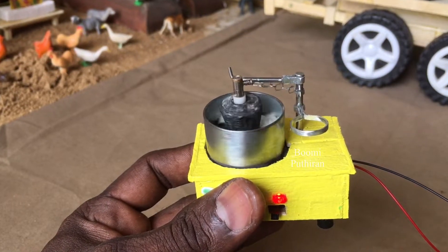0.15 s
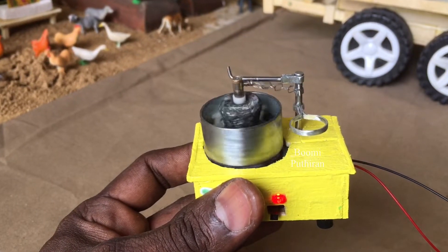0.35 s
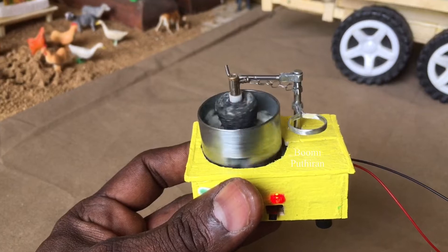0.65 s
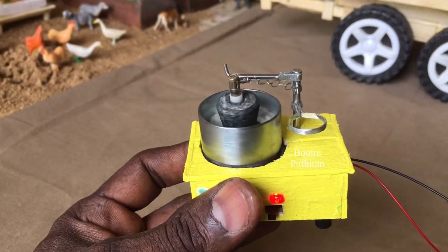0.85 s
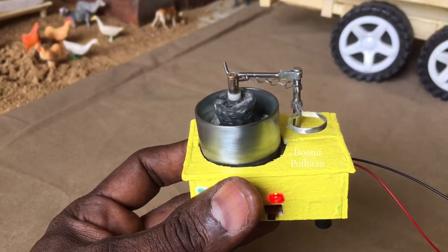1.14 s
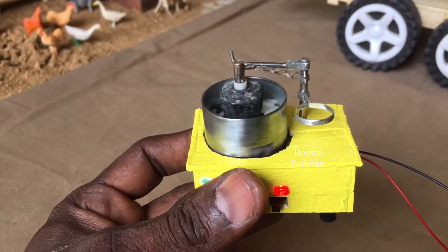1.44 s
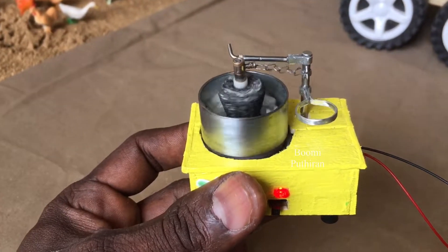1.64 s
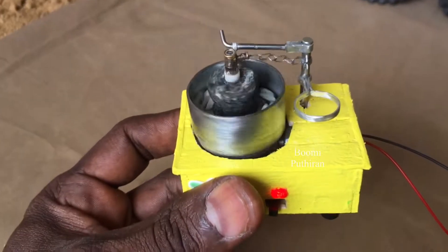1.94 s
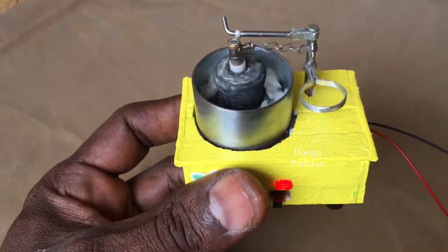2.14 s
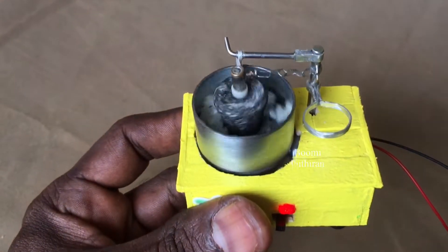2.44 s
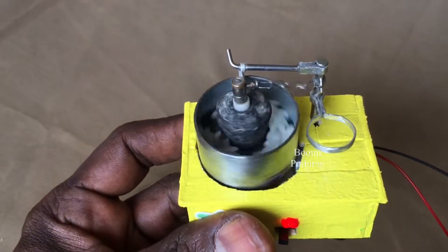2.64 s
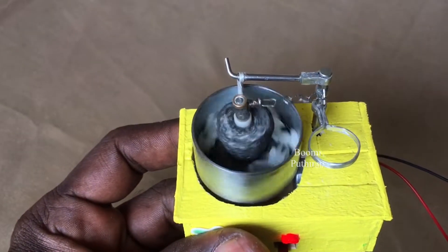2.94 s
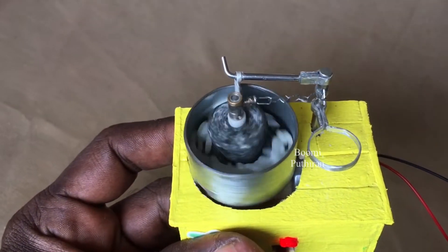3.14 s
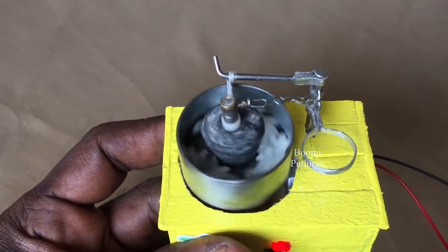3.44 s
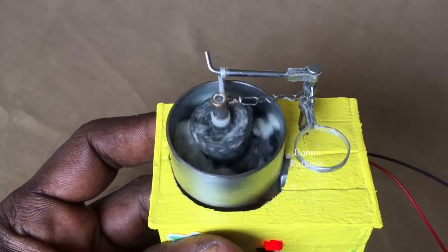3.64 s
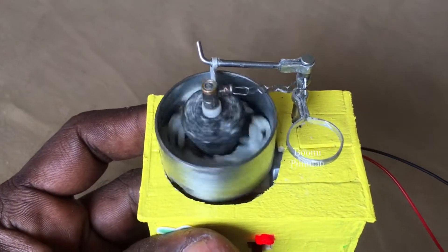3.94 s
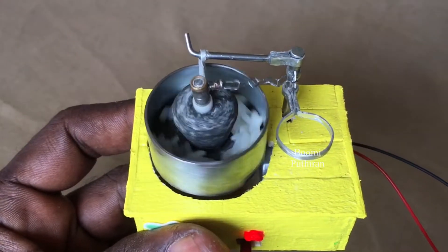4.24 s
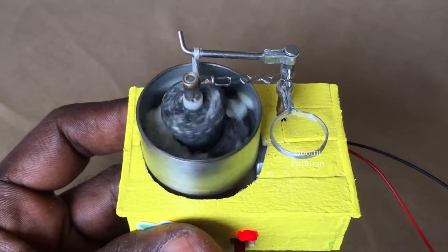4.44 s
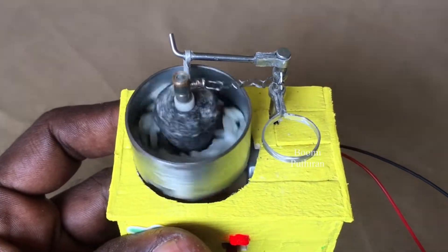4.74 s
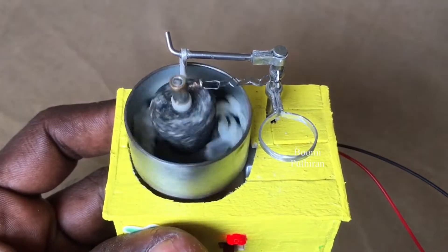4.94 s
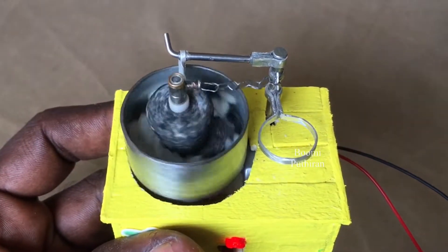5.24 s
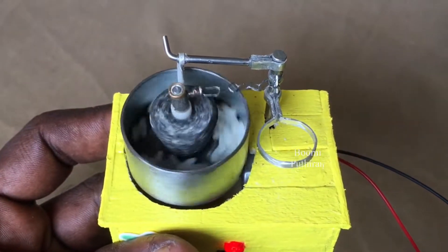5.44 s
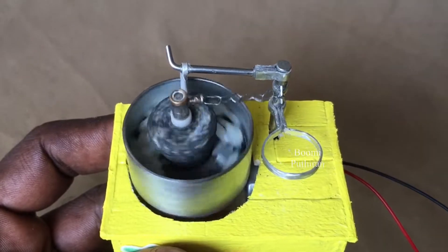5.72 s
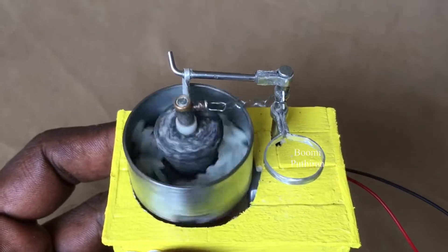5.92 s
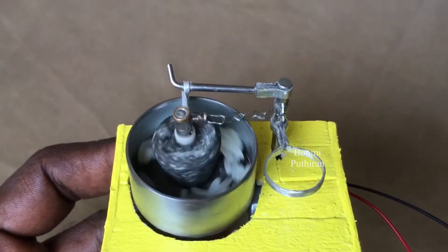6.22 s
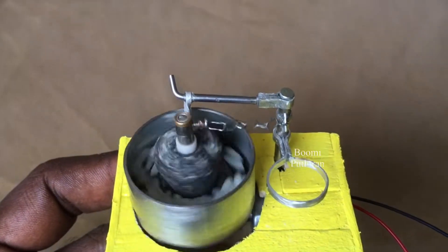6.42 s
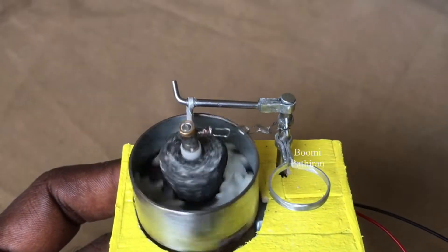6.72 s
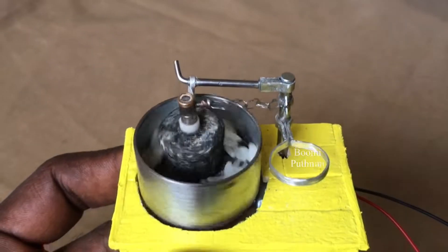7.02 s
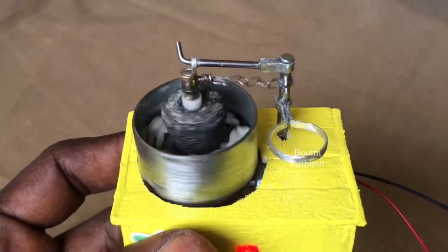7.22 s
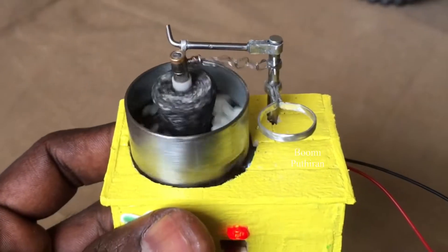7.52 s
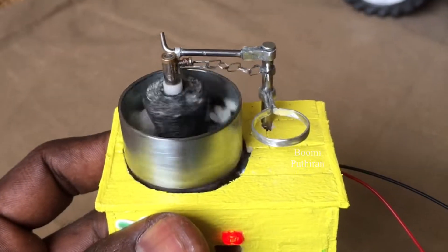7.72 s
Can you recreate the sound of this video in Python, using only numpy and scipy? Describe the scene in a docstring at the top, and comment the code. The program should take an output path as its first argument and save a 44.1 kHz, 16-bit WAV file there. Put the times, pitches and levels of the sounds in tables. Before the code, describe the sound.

A miniature grinder runs right at the microphone, its small motor and gears making a steady, raspy whine while grains sizzle and crackle against the steel drum. Two dull knocks and some hand rubbing come early, then the sizzle shifts in tone as the microphone moves above the drum. Faint taps follow, with two more clear knocks near the end. Far off, an engine rumbles and slowly draws nearer.

```python
"""Miniature wet grinder, close up

A hand-held grinder runs right at the microphone: a small motor spins a steel drum holding grains and a
roller. The gears rasp in a whining resonance of the housing and the grains sizzle on the steel. The
microphone moves from beside the drum to above it, then part of the way back. Dull taps and handling rub
come on top; far off, an engine rumbles and draws nearer."""
import sys
import numpy as np
from scipy import signal
from scipy.fft import rfft, irfft, next_fast_len
from scipy.io import wavfile

SR = 44100
rng = np.random.default_rng(int(sys.argv[2]) if len(sys.argv) > 2 else 0)


def wav_out(sig):
    """Save sig, one row per channel (or a flat mono array), as 16-bit PCM at SR to the path in sys.argv[1]."""
    wavfile.write(sys.argv[1], SR, np.round(np.clip(np.atleast_2d(sig).T, -1, 1) * 32767).astype(np.int16))


N = 347067
T = np.arange(N) / SR
MOTOR_HZ, ROLLER_HZ, CHATTER_HZ = 34.15, 5.8, 76.84


def amp(db):
    """Decibels to gain."""
    return 10 ** (np.asarray(db) / 20)


def unit(x):
    """Scales to rms 1."""
    return x / np.sqrt(np.mean(x ** 2) + 1e-20)


def curve(rows):
    """Joins (t/s, value) points by straight lines."""
    return np.interp(T, *np.transpose(rows))


def add(mix, start, sound):
    """Mixes a sound in at a time in seconds."""
    part = mix[round(start * SR):][:len(sound)]
    part += sound[:len(part)]


def wander(hz):
    """Random drift of rms 1, up to about the given rate."""
    size = next_fast_len(N)
    f = np.fft.rfftfreq(size, 1 / SR)
    spectrum = rfft(rng.standard_normal(size)) * np.exp(-(f / hz) ** 2) * (f > 0)
    return unit(irfft(spectrum, size)[:N])


def shaped(x, gain, size=4096):
    """Causal filter with the given gain over frequency; the result has rms 1."""
    f = abs(np.fft.fftfreq(size, 1 / SR))
    log_gain = np.log(np.maximum(gain(f), 1e-5))
    minimum_phase = np.exp(np.conj(signal.hilbert(log_gain)))
    ring = np.fft.ifft(minimum_phase).real[:size // 2]
    return unit(signal.oaconvolve(x, ring)[:len(x)])


def coloured(x, points, size=4096):
    """Filters x by a curve through (f/Hz, level/dB) points."""
    hz, db = np.transpose(points)
    return shaped(x, lambda f: amp(np.interp(np.log(f + 1), np.log(hz), db)), size)


def resonant(x, peaks):
    """Rings x in steep-sided resonances (f/Hz, half width/Hz, level/dB)."""
    def gain(f):
        return np.sqrt(sum((amp(db) / (1 + ((f - hz) / width) ** 2)) ** 2 for hz, width, db in peaks))
    return shaped(x, gain)


def throb(turns, sharp):
    """One bump each turn, mean 1."""
    bump = np.exp(sharp * np.cos(2 * np.pi * turns))
    return bump / bump.mean()


def clicks(per_s, spread_db):
    """Random tiny impacts of uneven size."""
    size = amp(spread_db * np.clip(rng.standard_normal(N), -2, 2)) * rng.choice([-1, 1], N)
    return unit(size * (rng.random(N) < per_s / SR))


def background():
    """Soft ambience of the place, with a few faint far tones, most of them sinking."""
    # spectrum of the ambience: f/Hz, level/dB
    air_spectrum = [(20, -33), (60, -28), (150, 7.5), (400, -3.5), (600, -9), (850, -2.5), (1100, -1.5),
                    (1500, -9.5), (3000, -13.5), (15000, -19.5)]
    # its course: t/s, level/dB
    air_level = [(0, -46), (1.0, -43.5), (2.08, -44.5), (2.17, -58.5), (7.2, -63), (7.87, -50)]
    # tones in the distance: t/s, length/s, first f/Hz, last f/Hz, level/dB
    far_tones = [(0, 0.49, 407, 372, -51), (0, 0.41, 592, 568, -61), (0.419, 0.29, 291.3, 291.5, -55.5),
                 (0.766, 0.13, 409, 382, -52)]
    out = amp(curve(air_level) + 2.4 * wander(hz=30)) * coloured(rng.standard_normal(N), air_spectrum)
    waver, flutter = 1 + 0.014 * wander(hz=25), amp(2 * wander(hz=15))
    for start, length, first_hz, last_hz, db in far_tones:
        count = int(length * SR)
        hz = np.linspace(first_hz, last_hz, count) * waver[:count]
        tone = np.sin(2 * np.pi * np.cumsum(hz) / SR) * flutter[:count]
        add(out, start, amp(db) * unit(tone * signal.windows.tukey(count, 0.3)))
    return out


def far_engine():
    """An engine throbs once a firing; only its rumble and hum carry this far."""
    # it pulls, drops back and pulls again: t/s, firing rate/Hz
    speed = [(0, 12.6), (2.9, 13.7), (3.9, 12.7), (6.2, 13.6), (6.6, 13.9), (6.9, 13.3), (7.87, 13.9)]
    # spectrum of the rumble: f/Hz, level/dB
    rumble_spectrum = [(14, -29), (27, -28), (36, -37), (55, -5.5), (70, 1), (79, -8), (96, 0.5),
                       (125, -2.5), (158, -5), (185, -18.5), (210, -14), (250, -27.5), (310, -32.5),
                       (600, -58)]
    # harmonics of the hum: multiple of the firing rate, level/dB
    harmonics = [(4, -24), (5, -5), (6, -7), (7, -19), (11, -15), (15, -21.5)]
    # the engine holds off, then draws nearer: t/s, level/dB
    approach = [(0, -38), (1.4, -39.5), (2.05, -41.5), (2.4, -37), (4.4, -36.5), (7.87, -29)]
    firings = np.cumsum(curve(speed)) / SR
    puffs = np.sqrt(throb(firings, sharp=0.21)) * rng.standard_normal(N)
    rumble = coloured(puffs, rumble_spectrum, size=16384)
    hum = sum(amp(db) * np.sin(2 * np.pi * (k * firings + 0.17 * wander(hz=8) + rng.random()))
              for k, db in harmonics)
    return amp(curve(approach)) * unit(rumble + hum)


def hand_rubs():
    """Skin slips on the casing in short dull scuffs that wake its resonances."""
    # scuffs of the hand: t/s, length/s, level/dB, centre f/Hz, width/Hz
    scuffs = [(0.838, .06, -39.5, 157, 200), (1.448, .06, -38, 306, 310), (1.76, .125, -30.5, 130, 237),
              (1.861, .12, -37.5, 450, 1300), (1.986, 0.13, -47.5, 800, 1200),
              (7.471, 0.063, -34, 150, 540)]
    # resonances of the casing: f/Hz, half width/Hz, level/dB
    casing = [(144, 33, 2), (226, 32, 3.5), (347, 220, 1.5), (467, 45, -12), (676, 32, 6), (920, 44, 2),
              (1080, 90, 6), (1400, 360, -15)]
    out = np.zeros(N)
    for start, length, db, hz, width in scuffs:
        count = int(length * SR)
        friction = resonant(rng.standard_normal(SR), [(hz, width / 2, 0)])
        scuff = unit(resonant(friction, casing)[-count:])
        add(out, start, amp(db) * scuff * signal.windows.tukey(count, 0.5))
    return out


def taps(rise_cycles, low_cut_hz, tick_db):
    """Dull blows; where one lands decides how much each group of modes rings, and the grip how long."""
    # t/s, level/dB of the low, middle and high modes, hardness as cutoff f/Hz, factor on the ring time
    blows = [(0.849, -30, -37, -50, 900, 1.7), (1.3956, 3, -4.5, -2.5, 1380, 0.97),
             (1.5896, -6, -15, 0, 1150, 0.84), (1.973, -16, -30, -44, 900, 0.96),
             (2.532, -26, -48, -54, 900, 0.58), (2.886, -23, -36, -37, 1200, 0.89),
             (3.594, -27, -45, -52, 895, 1.06), (5.569, -33, -48, -54, 900, 0.93),
             (5.806, -27, -49, -52, 900, 1.1), (6.078, -30, -47, -56, 900, 1.1),
             (7.297, -5.5, -9.5, -12, 1510, 1.1), (7.48, -27, -41, -46, 900, 0.71),
             (7.506, -23, -42, -50, 900, 0.8), (7.632, -3, -7, -10.5, 2750, 1)]
    # modes in a low, a middle and a high group: f/Hz, level/dB, t60/s
    mode_groups = [
        [(222, -11.5, 0.03), (366.6, -0.5, 0.032)],
        [(444, -4, 0.055), (491, -9, 0.1), (528, -1, 0.035), (690, -11, 0.063), (747, 1.5, 0.023)],
        [(907, -16.5, 0.073), (1020, 7, 0.015), (1312, -17, 0.065), (2690, -47, 0.025)],
    ]
    out, t = np.zeros(N), T[:SR // 5]
    for start, *levels, hard_hz, ring_factor in blows:
        tap = amp(max(levels) + tick_db - 60 * t / 0.031) * rng.standard_normal(len(t))  # contact tick
        for level, modes in zip(levels, mode_groups):
            for hz, db, t60 in modes:
                swell = 1 - np.exp(-hz * t / rise_cycles)
                decay = amp(level + db - 60 * t / (t60 * ring_factor))
                tap += decay * swell * np.sin(2 * np.pi * hz * t)
        band = signal.butter(2, [low_cut_hz, hard_hz], "bandpass", fs=SR, output="sos")
        add(out, start, signal.sosfilt(band, tap))
    return out


def crunching():
    """A large grain breaks under the roller in a sudden dense burst of tiny cracks."""
    # breaking grains: t/s, length/s, relative level/dB
    breaks = [(0.703, 0.0088, 5), (1.051, 0.011, 9), (1.18, 0.018, 9.5), (2.371, 0.014, 2),
              (4.372, 0.04, -3), (5.798, 0.014, 7), (6.321, 0.0053, 8), (6.344, 0.0064, 5.5),
              (6.489, 0.023, 6), (6.648, 0.0093, 6)]
    out = np.zeros(N)
    for start, length, db in breaks:
        count = int(length * SR)
        fade = np.sqrt(np.linspace(2, 0, count))
        add(out, start, amp(db) * fade * rng.standard_normal(SR // 10)[:count])
    return out


def snapping(clock, per_s, spread_db, t60):
    """Small grains snap under the roller, each in a very short puff."""
    sizes = clicks(per_s * throb(MOTOR_HZ * clock, sharp=1.1), spread_db)
    decay = amp(-60 * T[:SR // 20] / t60)
    power = signal.oaconvolve(sizes ** 2, decay ** 2)[:N]
    return unit(np.sqrt(abs(power)) * rng.standard_normal(N))


def roller_turns():
    """The roller turns steadily except where it slips on the grains and falls behind."""
    # slips: t/s, length/s, turns lost
    slips = [(2.397, 0.68, 0.47), (6.656, 0.34, 0.71)]
    return ROLLER_HZ * T - sum(lost * np.clip((T - start) / length, 0, 1) for start, length, lost in slips)


def contact(clock, motor_share, chatter_share, roller_depth, uneven_db=0):
    """Contact power: the gears catch once a motor turn, chatter in between, and the roller loads them."""
    catch = motor_share * throb(MOTOR_HZ * clock, sharp=13)
    chatter = chatter_share * throb(CHATTER_HZ * clock, sharp=1.03)
    roller = throb(roller_turns(), sharp=roller_depth)
    power = (1 + catch + chatter) * roller * amp(uneven_db * wander(hz=126))
    return power / power.mean()


def gear_whine(clock, snaps, crunch):
    """Tooth impacts ring the housing in spurts, and breaking grains ring it too."""
    # resonances of the housing: f/Hz, half width/Hz, level/dB
    housing = [(697, 184, -19.5), (943, 82, -17.5), (1370, 133, -14), (1797, 150, -2.5), (1921, 130, 0),
               (2130, 124, -6.5), (2480, 50, -13.5), (2794, 143, -14.5), (3080, 61, -15.5),
               (3326, 34, -13.5), (3502, 90, -13.5), (3833, 130, -12.5), (4280, 54, -17), (4360, 930, -26)]
    # the whine builds up, then swells a little with the load: t/s, level/dB
    whine_level = [(0, -41), (0.3, -44.5), (0.8, -41), (2.3, -39), (2.9, -39.5), (4.0, -38.5), (5.7, -39.5),
                   (6.5, -38), (7.3, -39.5)]
    power = contact(clock, motor_share=0.24, chatter_share=0.21, roller_depth=0.14)
    teeth = np.sqrt(power) * clicks(per_s=2600, spread_db=1.6) * amp(0.7 * wander(hz=25))
    drive = teeth + amp(-11) * snaps + amp(-5.5) * crunch
    return amp(curve(whine_level)) * resonant(drive, housing)


def grain_sizzle(clock, snaps, crunch):
    """Grains scrape and tick on the steel drum; its rim shades the resonances heard from the side."""
    # drum resonances, microphone at the side: f/Hz, half width/Hz, level/dB
    steel_beside = [(3636, 150, -1), (4150, 82, -4), (4710, 130, -4), (5350, 160, 0), (5930, 540, -5),
                    (6770, 270, 0), (7360, 350, -6.5), (8870, 320, 0), (9380, 370, 3), (10430, 280, 1.5),
                    (11160, 350, -8), (11650, 740, 1.5), (14200, 510, -4.5), (15200, 1600, -2.5)]
    # drum resonances, microphone overhead: f/Hz, half width/Hz, level/dB
    steel_above = [(5250, 210, -6), (5970, 540, 0), (6160, 110, -13.5), (7120, 190, -3.5), (7750, 280, 1.5),
                   (8440, 200, 1.5), (9030, 620, 0), (10060, 280, -4.5), (9940, 220, 3.5), (11030, 470, -3),
                   (12140, 380, -0.5), (13150, 500, 1), (14520, 420, 0), (15400, 230, -18)]
    # microphone position: t/s, view into the drum (0 beside, 1 above)
    mic_path = [(0, 0.076), (1.55, 0.038), (2.1, 0.96), (7.0, 0.96), (7.87, 0.71)]
    # sizzle at the microphone: t/s, level/dB
    sizzle_level = [(0, -38.5), (1.2, -40), (1.7, -40), (4.1, -39), (6.9, -39), (7.87, -41)]
    power = contact(clock, motor_share=0.26, chatter_share=0.86, roller_depth=0.28, uneven_db=2.5)
    grit = clicks(per_s=6500, spread_db=4.3) + amp(-9) * rng.standard_normal(N)
    drive = np.sqrt(power) * grit + amp(-2.5) * snaps + amp(-4) * crunch
    # hard and soft contacts alternate, so the top of the sizzle flickers
    dull = signal.sosfiltfilt(signal.butter(2, 8000, fs=SR, output="sos"), drive)
    drive = dull + (drive - dull) * amp(3.1 * wander(hz=246) - 0.5)
    above = curve(mic_path)
    side = np.sqrt(1 - above) * resonant(drive, steel_beside)
    overhead = np.sqrt(above) * resonant(drive, steel_above)
    overlap = np.sqrt(1 + 1.7 * np.sqrt(above * (1 - above)))  # the two views add partly in phase
    return amp(curve(sizzle_level)) * unit((side + overhead) / overlap)


def scene():
    """The close grinder and its handling over the far engine and the ambience, in mono."""
    sag_per_s = 0.0012  # share of its speed that the motor loses each second
    clock = T - sag_per_s * T ** 2 / 2 + 0.0007 * wander(hz=1.2)  # the motor's time, drifting a little
    snaps = snapping(clock, per_s=260, spread_db=1.8, t60=0.002)
    crunch = crunching()
    rumble = far_engine()
    grinding = gear_whine(clock, snaps, crunch) + grain_sizzle(clock, snaps, crunch)
    handling = taps(rise_cycles=0.48, low_cut_hz=218, tick_db=-10) + hand_rubs()
    load = amp(0.33 * wander(hz=9))  # the load of grains varies by chance
    return (rumble + load * grinding + handling + background())[None]


def gain_control(x, limit_db, attack_s, recover_db_per_s):
    """The recorder turns the level down just after a loud blow and lets it come back."""
    pole = np.exp(-1 / (attack_s * SR))
    smoothing = [1 - pole], [1, -pole]
    power_db = 10 * np.log10(signal.lfilter(*smoothing, x ** 2) + 1e-12)
    fall = recover_db_per_s * T
    held_db = np.maximum.accumulate(power_db + fall, axis=-1) - fall
    over_db = np.maximum(held_db - limit_db, 0)
    return x * amp(-signal.lfilter(*smoothing, over_db))


def record(dry):
    """The recorder: gain control, overload at full scale, then the band limit."""
    ducked = gain_control(dry, limit_db=-15.5, attack_s=0.015, recover_db_per_s=40)
    lowpass = signal.firwin(511, cutoff=15830, window=("kaiser", 9), fs=SR)
    return signal.oaconvolve(np.clip(ducked, -1, 1), lowpass[None], "same")


dry = scene()
out = record(dry)
wav_out(out)
```